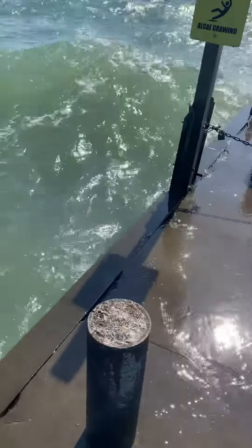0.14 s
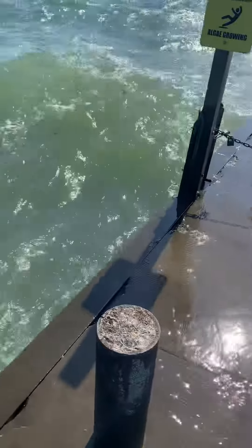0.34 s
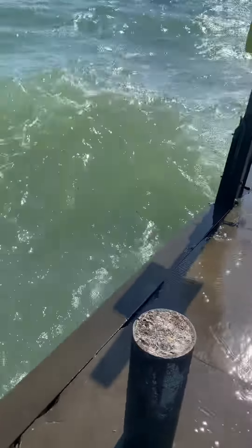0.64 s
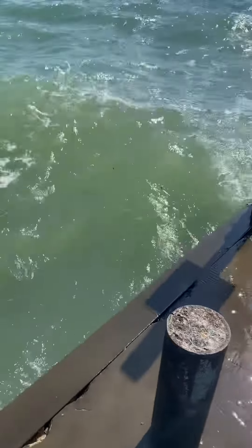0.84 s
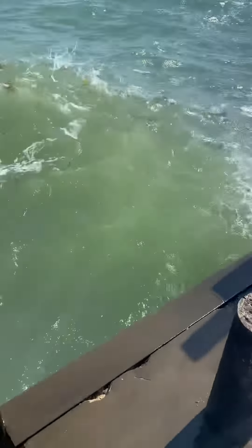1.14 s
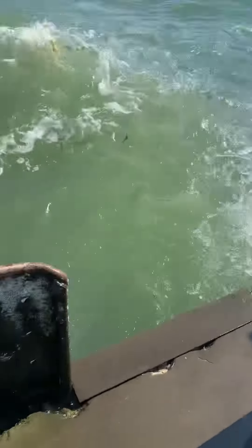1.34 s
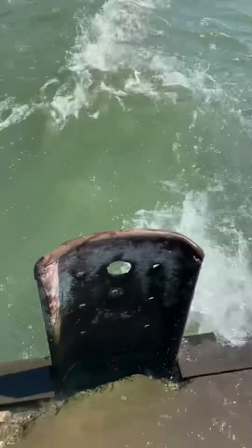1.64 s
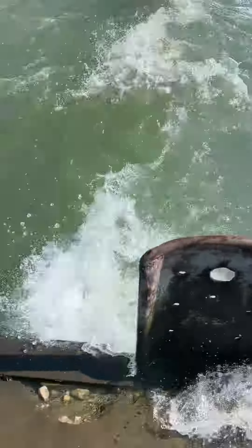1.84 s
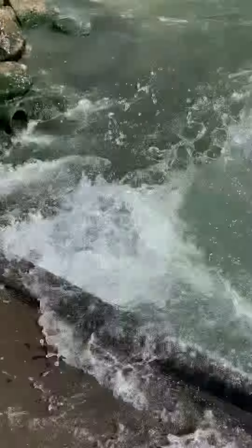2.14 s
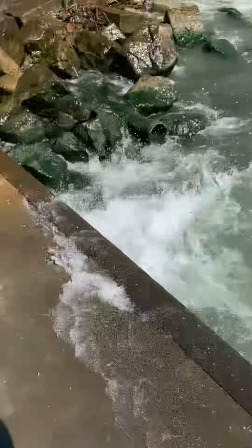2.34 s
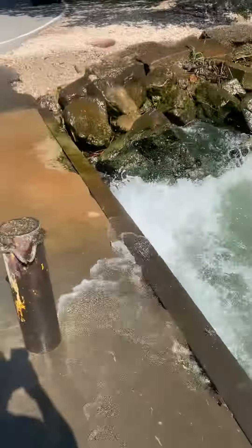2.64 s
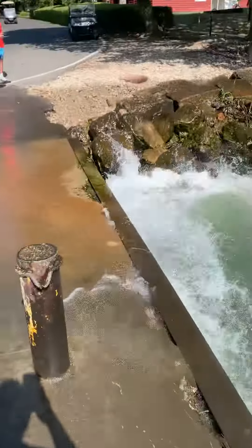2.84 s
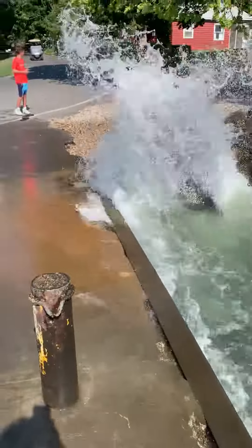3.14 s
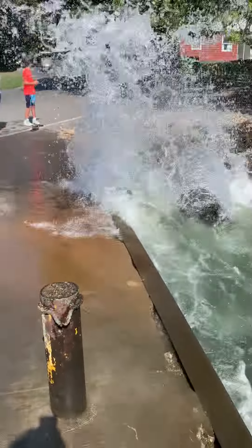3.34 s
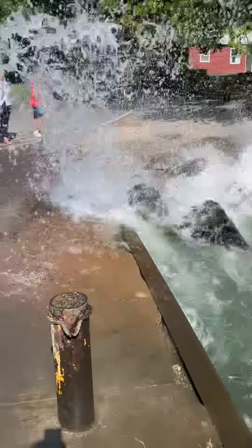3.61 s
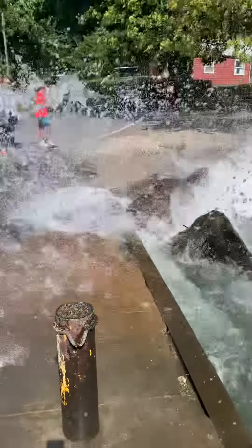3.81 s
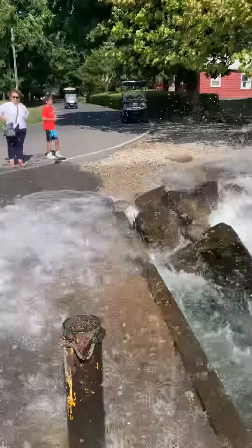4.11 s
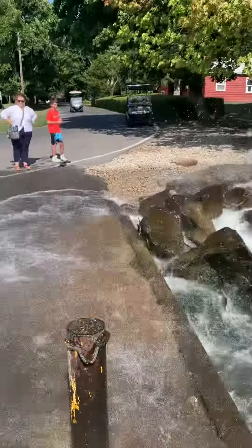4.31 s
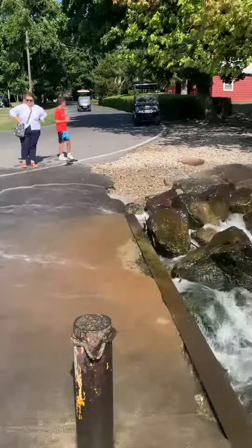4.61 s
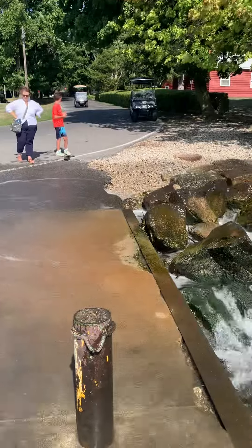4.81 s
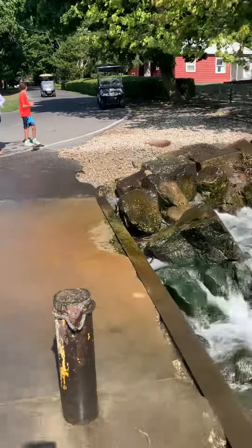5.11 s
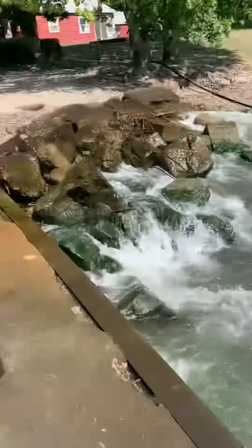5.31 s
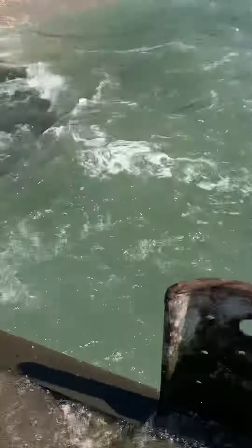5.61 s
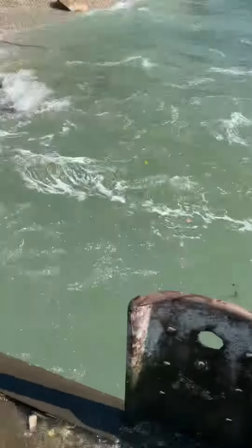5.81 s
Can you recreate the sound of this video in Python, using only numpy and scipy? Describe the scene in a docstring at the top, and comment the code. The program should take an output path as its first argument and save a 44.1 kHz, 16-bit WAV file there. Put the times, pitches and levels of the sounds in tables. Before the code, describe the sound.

Waves slap a concrete seawall and break over rocks, fizzing and spattering spray, while hard wind gusts thump and rumble on the microphone.

```python
"""Waves against a seawall in gusty wind

Waves slap a concrete seawall, break on the rocks beside it and throw up spray that rains down on the pavement.
Churning, bubbling and fizzing water is patchy noise mixed with showers of damped sines, under level curves.
Slaps are short puffs of banded noise, near drops are bare ticks, and clefts in the rocks ring in narrow bands.
Wind on the microphone is a low rumble swelling in puffs, with hard gusts of evened noise, bursts and shoves."""
import sys
import numpy as np
from scipy import signal
from scipy.fft import rfft, irfft, next_fast_len
from scipy.io import wavfile
from scipy.ndimage import uniform_filter1d, map_coordinates

SR = 44100
rng = np.random.default_rng(int(sys.argv[2]) if len(sys.argv) > 2 else 0)


def write(x):
    x = np.atleast_2d(x).T
    wavfile.write(sys.argv[1], SR, np.round(np.clip(x, -1, 1) * 32767).astype(np.int16))


N = 262836


def amp(db):
    """Decibels to gain."""
    return np.exp(np.asarray(db) * (np.log(10) / 20))


def unit(x):
    """Scale to rms 1."""
    return x / np.sqrt(np.mean(x ** 2) + 1e-20)


def along(points, hz):
    """Read (Hz, value) points on a log frequency axis."""
    point_hz, value = np.transpose(points)
    return np.interp(np.log(hz + 1), np.log(point_hz + 1), value)


def curves(rows):
    """One value per sample for each column after the time."""
    time_s, *columns = np.transpose(rows)
    return [np.interp(np.arange(N) / SR, time_s, column) for column in columns]


def wobble(rate):
    """A smooth random curve with the given number of knots a second."""
    knots = rng.standard_normal(int(N * rate / SR) + 4)
    return map_coordinates(knots, [np.arange(N) * rate / SR])


def filtered(x, response):
    """x times a response of frequency."""
    size = next_fast_len(N + SR // 2)
    gain = response(np.fft.rfftfreq(size, 1 / SR)).astype(np.complex64)
    return irfft(rfft(x.astype(np.float32), size) * gain, size)[..., :N]


def coloured(x, spectrum):
    """x through a spectrum of (Hz, dB) points, at rms 1."""
    return unit(filtered(x, lambda hz: amp(along(spectrum, hz))))


def rush(patchy_db):
    """Rushing water: two unrelated noises sharing patches of random gain in time and pitch."""
    z = signal.stft(rng.standard_normal((2, N)), nperseg=512)[2]
    field = uniform_filter1d(rng.standard_normal(z.shape[1:]), size=7, axis=0)  # smooth in pitch
    field = uniform_filter1d(field, size=9, axis=1)  # smooth in time
    return unit(signal.istft(z * amp(patchy_db * unit(field)), nperseg=512)[1][:, :N])


def grains(per_second, low_hz, high_hz, cycles, spread_db, rise, size):
    """Two unrelated showers of damped sines: ringing, rising bubbles, or splatter when they last few cycles."""
    draw = rng.random((int(2 * per_second * N / SR), 5)).astype(np.float32)
    when, pitch, weight, life, stream = draw.T[:, :, None]
    hz = low_hz * (high_hz / low_hz) ** pitch
    turns = hz * np.arange(size, dtype=np.float32) / SR
    age = turns / (float(cycles) * (.5 + life))
    strength = amp(-spread_db * np.log(np.maximum(weight, 1 / 500)))  # a few stand far above the rest
    phase = 2 * np.pi * turns * (1 + float(rise) * np.minimum(age, 2) / 2)
    wave = np.exp(-2 * age) * np.sin(phase) * strength
    start = (when * (N - size)).astype(int) + N * (stream > .5)  # the second shower follows the first
    where = start + np.arange(size)
    return unit(np.bincount(where.ravel(), wave.ravel(), 2 * N).reshape(2, N))


def surge(s, rise_s, fall_s, db, hold_s=0):
    """Power of an event that swells by 20 dB in rise_s up to time s, holds, then dies by 20 dB in fall_s."""
    t = np.arange(N, dtype=np.float32) / SR - float(s)
    before = np.maximum(-t / float(rise_s), 0)
    after = np.maximum((t - float(hold_s)) / float(fall_s), 0)
    return amp(db) ** 2 * np.exp(-2 * np.log(10) * np.minimum(before + after, 10))


def bursts(rows, hiss_db, attack_s):
    """Each blow is a dying puff of noise in a broad band, with some hiss on top."""
    out, t = np.zeros((2, N + SR)), np.arange(SR // 3) / SR
    for s, peak_db, hz, t60_s in rows:
        band = signal.butter(2, [hz / 2.2, hz * 1.21], "band", fs=SR)
        body = unit(signal.lfilter(*band, rng.standard_normal((2, len(t)))))
        hiss = amp(hiss_db) * rng.standard_normal((2, len(t)))
        puff = (body + hiss) * amp(-60 * t / t60_s) * (1 - np.exp(-t / attack_s))
        puff /= np.abs(puff).max(axis=1, keepdims=True)
        out[:, round(s * SR):][:, :len(t)] += amp(peak_db) * puff
    return out[:, :N]


def ports(pair):
    """Spread two unrelated signals over the two microphone ports: one in the bass, looser and left-led higher up."""
    # likeness of the two ports: hz, likeness (0-1)
    likeness = [(400, 1), (490, .95), (650, .83), (1200, .7), (2000, .72), (4200, .54), (6500, .82),
                (9000, .88), (15000, .9)]
    # phase by which the left port leads: hz, lead_rad
    lead = [(0, 0), (700, 0), (1600, .15), (2800, 2.1), (4200, 1.6), (5000, 3.1), (6700, 6.2), (7400, 6.5),
            (9700, 9.5), (12400, 12.6), (15000, 15.8)]
    # level of the left port over the right: hz, level_db
    lean = [(300, 0), (600, -.5), (2000, -1.5), (4000, -.2), (8000, 0)]

    def mid_side(hz):
        turn = np.arccos(np.clip(along(likeness, hz), 0, 1)) / 2
        return np.array([np.cos(turn), np.sin(turn)])

    half = np.array([[.5], [-.5]])  # each port takes half the difference

    def steer(hz):
        return amp(half * along(lean, hz)) * np.exp(1j * half * np.interp(hz, *np.transpose(lead)))

    mid, side = filtered(pair, mid_side)
    return filtered(np.array([mid + side, mid - side]), steer)


def churn():
    """Water heaving under the foam gulps large pockets of air, which ring low as it churns."""
    # heave of the water: time_s, level_db
    swell = [(0, -34), (1.2, -32), (1.85, -26.5), (2.5, -31.5), (2.85, -29), (3.6, -31), (4.3, -38),
             (5.1, -33.5), (5.6, -32), (5.96, -30.5)]
    # colour of the churning: hz, relative gain_db
    churn_spectrum = [(20, -100), (90, -32), (170, -0.5), (290, 0.5), (450, 0.5), (620, -11), (800, -41),
                      (1500, -51)]
    swell_db, = curves(swell)
    gulps = grains(per_second=80, low_hz=218.0, high_hz=652, cycles=2.84, spread_db=1, rise=0.15, size=1400)
    water = coloured(rush(patchy_db=-1) + amp(-14.5) * gulps, churn_spectrum)
    return amp(swell_db + 0.62 * wobble(21.87)) * water


def clefts():
    """Wave water surging through clefts in the rocks: narrow bands of noise whose pitch sways at random."""
    # surges through the hollows: crest_s, rise_s and fall_s (each by 20 dB), level_db, pitch_hz
    cleft_rows = [(.28, 4, 2, -36, 562), (3.42, 2, 2, -34, 870), (4.45, 0.5, 1.3, -41.5, 884)]
    width, sway = .16, .05  # half bandwidth and drift, as shares of the pitch
    out, index = np.zeros((2, N)), np.arange(N)
    for s, rise_s, fall_s, db, hz in cleft_rows:
        band = signal.butter(2, [hz / (1 + width), hz * (1 + width)], "band", fs=SR)
        ring = unit(signal.lfilter(*band, rng.standard_normal((2, N))))
        clock = np.cumsum(1 + sway * wobble(8)) % N
        swayed = np.array([np.interp(clock, index, side) for side in ring])
        out += np.sqrt(surge(s, rise_s, fall_s, db)) * amp(1.8 * wobble(22.46)) * swayed
    return out


def spurts():
    """Small bursts of water: a random flicker of rms 1 whose peaks start at once and die away."""
    per_second, fall_s = 45, 0.016
    starts = (rng.random(N) < per_second / SR) * (.5 + rng.random(N))
    flicker = signal.lfilter([1], [1, -np.exp(-1 / (fall_s * SR))], starts)
    return unit(flicker - flicker.mean())


def surf_levels():
    """Gains of wash, foam and spray: breakers and splashes swell out of lingering froth and drizzle."""
    # All levels stand before the trim that each layer adds.
    # foam left on the water by earlier waves: time_s, wash_db, foam_db
    froth = [(0, -38, -48), (.55, -39, -46.5), (.75, -36.5, -43.5), (1.15, -34, -39.5), (2.2, -33.5, -44),
             (2.55, -37, -51), (3.1, -36, -50), (3.8, -34, -47), (4.25, -38.5, -46), (4.5, -35.5, -43),
             (5.25, -34.5, -46), (5.5, -30.5, -37), (5.96, -30, -38.5)]
    # drizzle of spray on the pavement: time_s, spray_db
    drizzle = [(0, -55), (.55, -53), (.75, -48.5), (1.05, -43), (2.5, -41.5), (3.1, -44.5), (4.45, -41),
               (5.0, -44), (5.35, -38.5), (5.96, -43)]
    # waves breaking: crest_s, rise_s and fall_s (each by 20 dB), wash_db, foam_db, spray_db
    breaker_rows = [(1.388, 0.1, 0.37, -24.5, -33.5, -34.5), (1.76, 0.31, 0.75, -24.5, -32, -36.5),
                    (2.27, 0.15, 0.13, -31.5, -45.5, -35), (2.79, 0.5, 0.22, -31, -40.5, -34.5),
                    (3.45, 1, 2.5, -34.5, -44.5, -42.5), (4.04, 0.58, 0.22, -33.5, -28.5, -22.5),
                    (4.19, 0.1, 0.22, -54, -37, -29.5)]
    # small splashes against the wall, all of one shape: time_s, foam_db
    splash_rows = [(.125, -40), (.7, -44), (.91, -39), (1.0, -34), (1.055, -32), (1.29, -45), (1.67, -30.5),
                   (2.05, -34), (2.33, -46), (3.01, -44), (4.12, -31), (4.68, -39.5), (4.93, -37.5),
                   (5.33, -56), (5.569, -29.5), (5.75, -33)]
    crest_hold_s = 0.059
    splash_over_foam_db = [4, 0, -10]  # wash, foam, spray
    power = amp(curves(froth) + curves(drizzle)) ** 2
    for s, rise_s, fall_s, *levels_db in breaker_rows:
        power = power + np.outer(amp(levels_db) ** 2, surge(s, rise_s, fall_s, 0, crest_hold_s))
    splashes = sum(surge(s, rise_s=0.036, fall_s=0.065, db=db) for s, db in splash_rows)
    return np.sqrt(power + np.outer(amp(splash_over_foam_db) ** 2, splashes))


def tumble(bubbles, flicker):
    """The restless sea between breakers: rushing noise with a few bubbles in it."""
    # strength of the sea: time_s, level_db
    sea = [(0, -32.5), (.9, -32.5), (1.2, -34.5), (1.8, -27.5), (1.97, -44.5), (2.25, -32), (2.62, -39.5),
           (2.85, -31.5), (3.1, -34), (3.8, -31.5), (4.2, -42), (5.0, -36), (5.4, -35.5), (5.96, -29.5)]
    # colour of the tumbling: hz, relative gain_db
    tumble_spectrum = [(100, -100), (380, -10), (540, -4), (680, 0), (950, -1.5), (1200, -10.5),
                       (1800, -24), (4000, -60)]
    sea_db, = curves(sea)
    water = coloured(rush(patchy_db=2.5) + amp(-21.0) * bubbles, tumble_spectrum)
    return amp(sea_db + 0.54 * flicker) * water


def repitched(pair, ratio):
    """Both signals with all their frequencies moved by a changing ratio."""
    clock = np.cumsum(ratio) % (N - 1)
    return np.array([map_coordinates(side, [clock], order=2) for side in pair])


def wash(wash_gain, bubbles, flicker):
    """Bubbling wash: rushing noise and ringing bubbles whose pitch shifts together."""
    # colour of the wash: hz, relative gain_db
    wash_spectrum = [(200, -100), (800, -33), (1080, -2.5), (1300, 0), (1650, -0.5), (2250, -2), (2900, -5),
                     (4500, -24.5), (9000, -58)]
    # pitch of the wash over time: time_s, frequency ratio
    wash_pitch = [(0, 1.016), (1.3, 1.006), (1.45, 1.04), (1.68, 0.94), (1.8, 1.04), (1.95, 1.23),
                  (2.2, 1.02), (2.6, 1), (2.82, 1.08), (3.1, .96), (4.05, 1.08), (4.4, 0.95), (5.96, 0.99)]
    water = coloured(rush(patchy_db=2.5) + amp(-9.5) * bubbles, wash_spectrum)
    return wash_gain * amp(-1.07 + 0.79 * flicker) * repitched(water, curves(wash_pitch)[0])


def foam(foam_gain, flicker):
    """Fizzing foam: a dense shower of tiny bubbles in patchy noise."""
    # colour of the foam: hz, relative gain_db
    foam_spectrum = [(400, -100), (1700, -4), (2600, -5), (3600, -0.5), (4600, 0), (6600, 0.5),
                     (7700, -2.5), (10000, -19), (16000, -10)]
    fizz = grains(per_second=1500, low_hz=2640, high_hz=8600, cycles=5.7, spread_db=1.5, rise=0.093, size=100)
    water = coloured(rush(patchy_db=2.0) + amp(-5.5) * fizz, foam_spectrum)
    return foam_gain * amp(3.5 + 0.64 * flicker) * water


def spray(spray_gain, flicker):
    """Spray pattering down on the pavement: short, steady-pitched ticks of droplets in patchy noise."""
    # colour of the spray: hz, relative gain_db
    spray_spectrum = [(1000, -100), (4000, -20), (7500, -13), (8150, 0), (9500, -2), (12000, -2.2),
                      (13600, -3.5), (15000, -7)]
    patter = grains(per_second=2500, low_hz=7000, high_hz=14000, cycles=4, spread_db=3.5, rise=0, size=48)
    water = coloured(rush(patchy_db=3.0) + amp(-7.5) * patter, spray_spectrum)
    return spray_gain * amp(2.0 + 0.6 * flicker) * water


def jets(flicker):
    """Sheets of water shooting up between the rocks: very patchy noise in a band of its own."""
    # the sheets: crest_s, rise_s and fall_s (each by 20 dB), level_db
    jet_rows = [(2.78, 0.23, 0.2, -34.5), (3.85, 2.6, 1.5, -40)]
    # colour of a sheet: hz, relative gain_db
    sheet_spectrum = [(1000, -100), (3000, -20), (3650, -4), (4400, 5), (5200, 5), (6000, -23),
                      (12000, -80)]
    jet_gain = np.sqrt(sum(surge(s, rise_s, fall_s, db) for s, rise_s, fall_s, db in jet_rows))
    return jet_gain * amp(flicker) * coloured(rush(patchy_db=5.0), sheet_spectrum)


def near_water(wash_gain, spray_gain):
    """Single bubbles plop in the wash, droplets crackle over it in clumps, large drops smack among the spray."""
    plops = grains(per_second=55, low_hz=1200, high_hz=3700, cycles=28.6, spread_db=2.0, rise=0.096, size=1600)
    crackle = grains(per_second=300, low_hz=1500, high_hz=5570, cycles=3, spread_db=2.0, rise=0, size=128)
    smacks = grains(per_second=160, low_hz=2190, high_hz=8000, cycles=1.8, spread_db=3.0, rise=0, size=64)
    clumps = unit(crackle * amp(2.2 * spurts()))
    over_wash = wash_gain * (amp(-9) * plops + amp(-11.5) * clumps)
    return over_wash + amp(-10) * spray_gain * smacks


def breakers():
    """The sea tumbles, wash bubbles, foam fizzes, spray patters and jets shoot up, under one shared flicker."""
    wash_gain, foam_gain, spray_gain = surf_levels()
    flicker = spurts()
    bubbles = grains(per_second=600, low_hz=756, high_hz=3233, cycles=10.0, spread_db=1.5, rise=0.082, size=600)
    water = tumble(bubbles, flicker) + wash(wash_gain, bubbles, flicker) + foam(foam_gain, flicker)
    thrown = spray(spray_gain, flicker) + jets(flicker)
    return water + thrown + near_water(wash_gain, spray_gain)


def breeze():
    """Steady wind on the microphone: a low rumble that soft puffs swell."""
    # soft puffs: time_s, level_db
    puff_rows = [(.1, -23), (.21, -24), (0.609, -27), (1.0, -29), (1.7, -28), (1.8, -25), (2.0, -17),
                 (2.07, -17.5), (2.15, -19.5), (2.23, -17.5), (2.36, -17.5), (2.58, -18.5), (3.02, -22),
                 (3.2, -21), (3.45, -25.5), (3.74, -20.5), (4.05, -21.5), (4.39, -23.5), (4.51, -18.5),
                 (4.71, -26), (5.14, -25), (5.45, -19), (5.91, -26)]
    # colour of the rumble: hz, relative gain_db
    rumble_spectrum = [(8, -70), (28, -17), (45, -4.5), (68, 0.5), (110, -2.5), (170, -7), (300, -17.5),
                       (800, -76)]
    lull_s, lull_db = 5.53, -2.5  # the steady wind eases after the last gust
    steady_db = -28.5 + 0.5 * wobble(7.1) + curves([(lull_s - .1, 0), (lull_s, lull_db)])[0]
    puffs = sum(surge(s, rise_s=0.1, fall_s=0.095, db=db) for s, db in puff_rows)
    return np.sqrt(amp(steady_db) ** 2 + puffs) * coloured(rng.standard_normal(N), rumble_spectrum)


def even(x):
    """Noise without its chance lulls: a dense, unbroken roar, held to an even strength over 30 ms."""
    power = uniform_filter1d(np.atleast_2d(x ** 2).mean(axis=0), size=int(.03 * SR))
    return x / np.sqrt(np.abs(power) + 1e-9)


def gusts():
    """Large eddies shake the microphone; small ones gain on them as the force grows."""
    # hard gusts: start_s, hold_s, force_db
    gust_rows = [(0.614, 0.05, -36), (1.995, .12, -30), (2.12, 0.047, -15.5), (2.184, 0.12, -14.5),
                 (2.327, 0.065, -15.5), (4.68, 0.057, -20), (5.175, .03, -28), (5.212, 0.09, -15),
                 (5.305, 0.09, -12), (5.417, 0.019, -14)]
    # colour of the large eddies: hz, relative gain_db
    buffet_spectrum = [(20, -60), (45, -2), (85, 2), (150, 5), (260, -1.5), (500, -11.5), (1200, -75.5)]
    # colour of the small eddies: hz, relative gain_db
    flutter_spectrum = [(60, -38), (140, -12), (205, 5), (270, 4.5), (420, 3), (620, 0), (900, -12.5),
                        (1400, -7), (3000, -50)]
    force = np.sqrt(sum(surge(s, 0.035, 0.051, db, hold_s) for s, hold_s, db in gust_rows))
    large = amp(-3) * force ** 0.92 * even(coloured(rng.standard_normal(N), buffet_spectrum))
    small = amp(0.5) * force ** 1.21 * even(coloured(rng.standard_normal((2, N)), flutter_spectrum))
    return amp(-3.5 + 0.7 * wobble(45)) * (large + ports(small))


def thumps():
    """Single eddies burst on the microphone as short puffs of noise."""
    # the eddies: start_s, peak_db (before the spread over the ports), centre_hz, t60_s
    thump_rows = [(.16, -17, 149, .07), (.228, -19, 171, .07), (.568, -18.5, 650, 0.027),
                  (.585, -17, 700, .03), (.658, -15.5, 700, .04), (2.118, -7.5, 230, .06),
                  (2.141, -1.5, 470, 0.11), (2.2, -6, 240, 0.061), (2.276, -5, 250.2, 0.038),
                  (2.342, -7, 500, 0.044), (4.667, -13, 550, 0.12), (4.679, -10.5, 541, .13),
                  (4.752, -19, 649, 0.035), (5.206, -11, 493, .12), (5.213, -7.5, 420, .08),
                  (5.244, -5, 556, 0.08), (5.318, -11, 900, 0.12), (5.35, -5.5, 380, 0.12),
                  (5.384, -8, 560, 0.056), (5.416, -7.5, 480, .11)]
    return ports(bursts(thump_rows, hiss_db=-43, attack_s=0.00054))


def shoves():
    """A large eddy pushes the microphone once; the pressure swings a few times and settles."""
    # the pushes: start_s, level_db (before attack and decay), pitch_hz (wanders at random), t60_s
    shove_rows = [(.587, -9, 125, 0.065), (.619, -10.5, 115, .1), (.663, -12, 176, .04),
                  (1.8, -12.5, 140, 0.046), (2.066, -4.5, 94, 0.11), (2.143, -4, 190, 0.088),
                  (4.693, -7, 140, .1), (5.302, -4.5, 200, 0.053), (5.438, -4.5, 135, .08)]
    attack_s = 0.0018
    out, t = np.zeros(N + SR), np.arange(SR // 4) / SR
    for s, db, hz, t60_s in shove_rows:
        turns = hz * np.cumsum(1 + 0.14 * wobble(120)[:len(t)]) / SR
        push = amp(db - 60 * t / t60_s) * (1 - np.exp(-t / attack_s))
        out[round(s * SR):][:len(t)] += push * np.sin(2 * np.pi * turns)
    return out[:N]


def wind():
    """All the wind on the microphone: breeze, gusts, shoves and thumps."""
    return breeze() + gusts() + shoves() + thumps()


def slaps():
    """Water slaps the wall around a pocket of air: a puff of noise about the pitch of the trapped air."""
    # the slaps: start_s, peak_db (before the spread over the ports), pitch_hz, t60_s
    slap_rows = [(.066, -18, 560, 0.11), (.122, -16, 800, .07), (1.032, -14.5, 430, 0.12),
                 (1.05, -14, 950, 0.058), (1.2867, -16, 1040, 0.061), (1.383, -8, 1300, 0.033),
                 (1.405, -14, 1600, .07), (1.407, -4, 493, 0.069), (1.663, -11.5, 1490, 0.031),
                 (1.669, -7.5, 324, 0.02), (1.709, -13.5, 1510, .06), (1.749, -13, 1900, 0.056),
                 (1.9, -16, 2100, .04), (1.982, -20, 1900, .035), (2.05, -17, 1700, .04),
                 (2.548, -15, 420, .09), (2.612, -15, 550, 0.035), (2.808, -17.5, 1000, .09),
                 (2.853, -23, 1100, 0.051), (2.974, -14, 397.5, 0.11), (2.996, -10.5, 377, 0.089),
                 (3.028, -17, 520, 0.056), (4.012, -16, 2301, .03), (4.035, -14.5, 2300, .035),
                 (4.058, -17, 1500, .04), (4.11, -19, 1900, 0.05), (5.565, -22, 1300, .07)]
    return bursts(slap_rows, hiss_db=-36, attack_s=0.0007)


def drops():
    """Near drops hit the concrete as bare ticks of bright noise, down by 60 dB after 18 ms."""
    # the drops: start_s, rough peak_db (before the spread over the ports)
    drop_rows = [(1.0026, -14.5), (1.3199, -9.5), (1.6646, -9), (4.1204, -6), (5.464, -25)]
    ticks, t = np.zeros((2, N + SR)), np.arange(SR // 20) / SR
    for s, db in drop_rows:
        tick = unit(np.diff(rng.standard_normal((2, len(t) + 1))))
        # 9 dB leaves room for the peaks of the noise over its rms
        ticks[:, round(s * SR):][:, :len(t)] += amp(db - 9 - 60 * t / 0.018) * tick
    return ticks[:, :N]


def scene():
    """The sea spreads over both ports; the wind is nearly the same in each."""
    return ports(churn() + clefts() + breakers() + slaps() + drops()) + wind()


def record(dry):
    """The recorder rounds off the largest peaks in both channels alike and keeps nothing above its band limit."""
    top_hz = 14900
    gain = (1 + (np.abs(dry).max(axis=0) / .92) ** 12) ** (-1 / 12)
    return filtered(dry * gain, lambda hz: hz < top_hz)


dry = scene()
out = record(dry)
write(out)
```